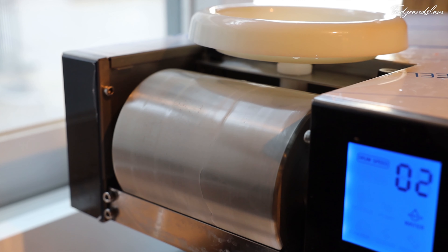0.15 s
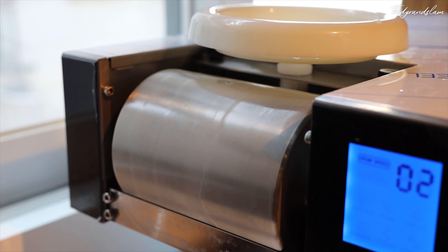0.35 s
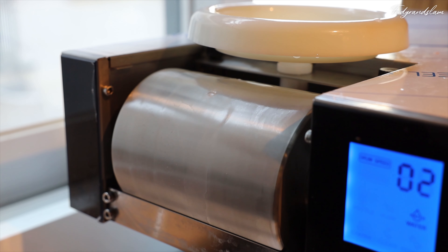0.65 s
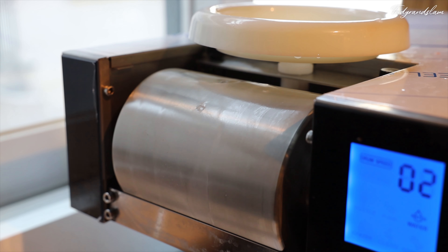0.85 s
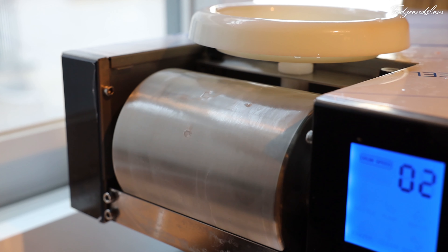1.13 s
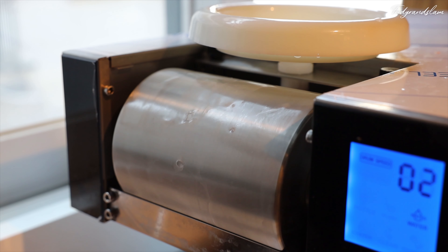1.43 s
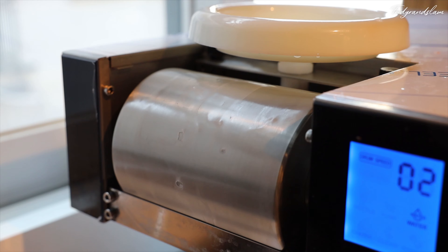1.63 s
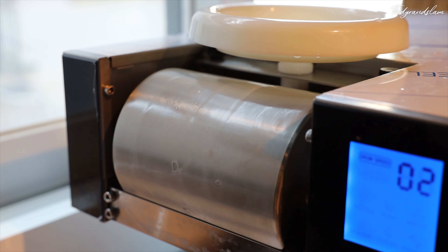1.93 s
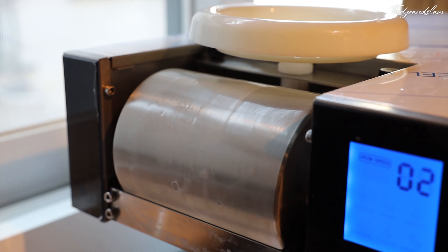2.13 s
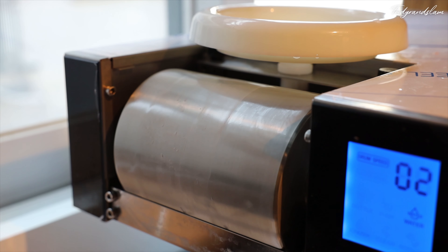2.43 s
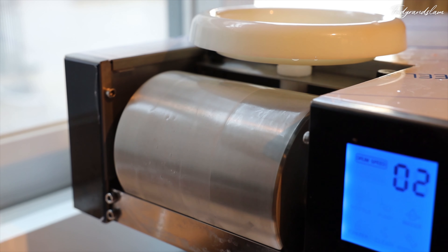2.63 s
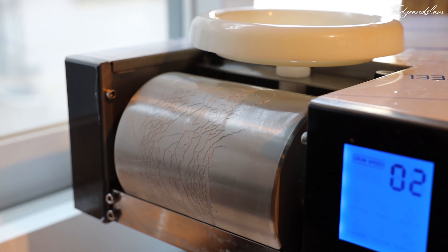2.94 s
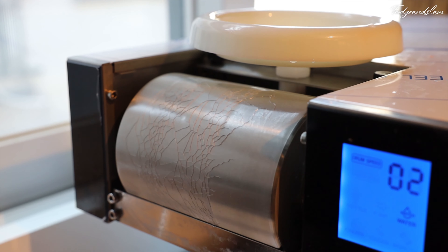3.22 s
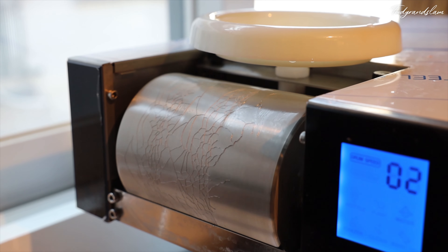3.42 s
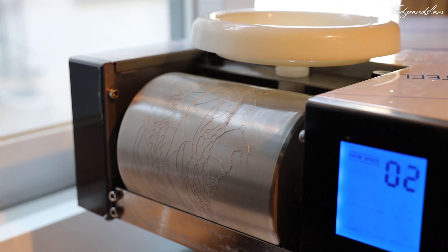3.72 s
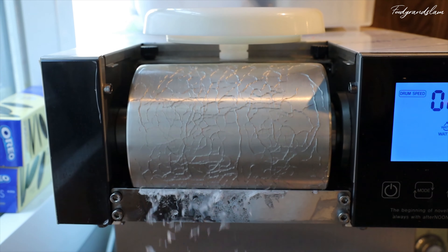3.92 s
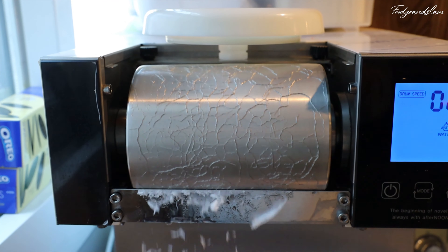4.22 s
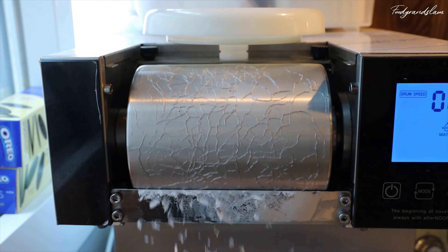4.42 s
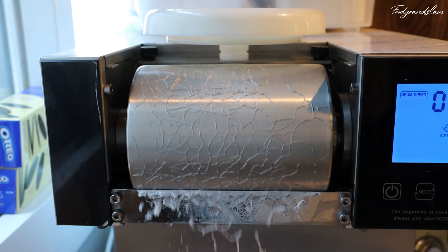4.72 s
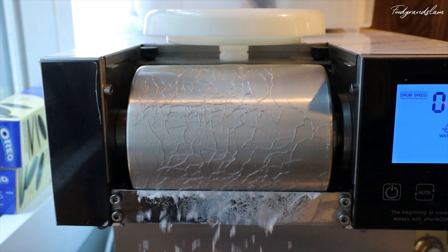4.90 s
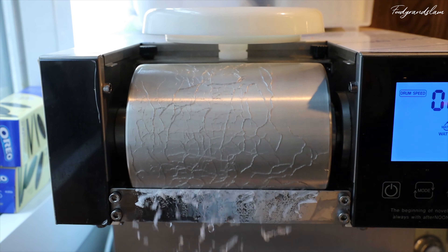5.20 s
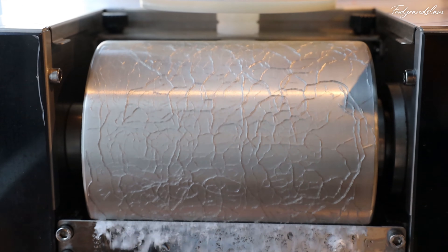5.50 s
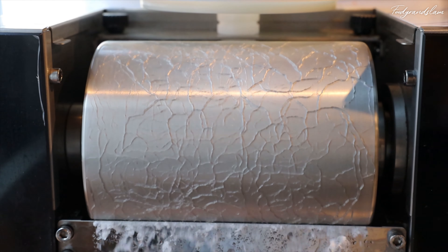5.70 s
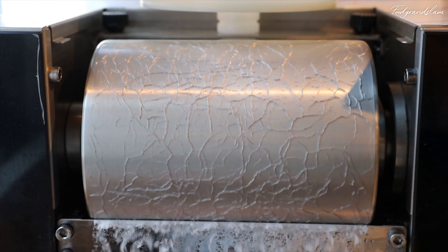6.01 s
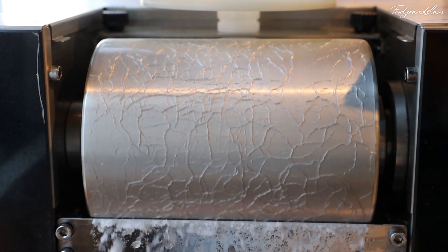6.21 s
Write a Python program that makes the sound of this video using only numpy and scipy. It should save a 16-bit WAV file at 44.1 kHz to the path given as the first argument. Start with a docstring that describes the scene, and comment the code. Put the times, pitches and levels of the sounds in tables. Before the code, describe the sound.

A motorised blade hisses over a turning frozen drum, then bites into a coarse, crackling rasp, with two steel clinks and a dull thump.

```python
"""An ice shaver, close and in mono in a cafe: a blade scrapes a turning frozen drum over the hum of a
geared mains motor. The blade first skims with a thin hiss of tiny fractures, and steel clinks twice.
Then it bites deeper and rasps inside the steel housing while flakes of ice snap off the edge.
A dull knock shakes the counter, and a faint one follows."""
import sys
import numpy as np
from scipy import signal
from scipy.fft import rfft, irfft, next_fast_len
from scipy.io import wavfile
from scipy.ndimage import map_coordinates

SR = 44100
rng = np.random.default_rng(int(sys.argv[2]) if len(sys.argv) > 2 else 0)


def master_out(mix):
    """Clip the mix to full scale and print it as 16-bit PCM to the path in sys.argv[1]."""
    frames = np.transpose(np.atleast_2d(mix))
    ceiling = np.clip(frames, -1, 1)
    pcm = np.round(ceiling * 32767).astype(np.int16)
    wavfile.write(sys.argv[1], SR, pcm)


N = 280035
TIME_S = np.arange(N) / SR
BITE_S, BITE_RISE_S = 3.895, 0.066  # the blade digs in


def amp(db):
    """Decibels to gain."""
    return 10 ** (np.asarray(db) / 20)


def unit(x):
    """x scaled to rms 1."""
    return x / np.sqrt(np.mean(x ** 2) + 1e-20)


def ramp(start_s, rise_s):
    """A straight fade from 0 to 1."""
    return np.clip((TIME_S - start_s) / rise_s, 0, 1)


def decay(start_s, t60, attack):
    """Envelope of a blow; t60 and attack in seconds."""
    age = np.maximum(TIME_S - start_s, 0)
    return amp(-60 * age / t60) * (1 - np.exp(-age / attack))


def wobble(rate):
    """A smooth random curve, rate knots a second."""
    coarse = np.arange(0, N + 32, 32)
    knots = rng.standard_normal(int(N * rate / SR) + 4)
    return np.interp(np.arange(N), coarse, map_coordinates(knots, [coarse * rate / SR]))


def filtered(x, response):
    """x through an EQ given as gain against frequency."""
    size = next_fast_len(N + SR // 2)
    return irfft(rfft(x, size) * response(np.fft.rfftfreq(size, 1 / SR)), size)[:N]


def coloured(x, spectrum):
    """x through an EQ curve of (freq_hz, gain_db) points, at rms 1."""
    freq_hz, gain_db = np.transpose(spectrum)
    return unit(filtered(x, lambda hz: amp(np.interp(np.log(hz + 1), np.log(freq_hz + 1), gain_db))))


def noise(spectrum):
    """Fresh coloured noise at rms 1."""
    return coloured(rng.standard_normal(N), spectrum)


def ring(start_s, modes, attack):
    """Struck modes ring out as damped sines."""
    age = TIME_S - start_s
    return sum(amp(db) * np.sin(2 * np.pi * hz * age) * decay(start_s, t60, attack)
               for hz, db, t60 in modes)


def resonated(x, modes, swell_db):
    """x through resonances that each swell and fade on their own, at rms 1."""
    out = np.zeros(N)
    for hz, width_hz, db in modes:
        b, a = signal.iirpeak(hz, hz / width_hz, SR)
        out += amp(db + swell_db * wobble(11)) * signal.lfilter(b, a, x)
    return unit(out)


def housing(x, wet_db, t60):
    """Dense short echoes between the steel walls ripple the spectrum; the level stays the same."""
    t = np.arange(SR // 6) / SR
    echoes = rng.standard_normal(len(t)) * amp(-60 * t / t60) * (t > 0.001)
    wet = signal.fftconvolve(x, echoes / np.linalg.norm(echoes))[:N]
    return unit(x + amp(wet_db) * wet) * np.std(x)


# Motor harmonics while skimming and while biting: multiple, gain_db
HUM_SKIM = [(1, -17), (2, -13), (3, -7), (4, -24.5), (5, -24), (6, -5.5), (7, -5.5), (8, 1), (9, -16),
            (10, -23), (12, -12.5), (13, -24), (14, -25.5)]
HUM_BITE = [(1, -37), (2, -8), (3, -8), (4, -14), (5, -19.5), (6, -4), (7, 1.5), (8, -5), (9, -24),
            (10, -17), (11, -18), (12, -9)]
# Rush of gears and cooling air: freq_hz, gain_db
RUSH_EQ = [(15, -31), (45, -6), (90, -12), (170, -1), (270, -4.5), (420, -1.5), (680, -1), (850, -6),
           (1020, 0), (1250, -4.5), (1900, -5.5), (3500, -12.5), (9000, -18)]
# Casing resonances: pitch_hz, width_hz, gain_db
PANEL_MODES = [(1432, 11, 5), (1654, 140, -10.5), (2075, 98, -12.5), (2410, 89, -11)]

def motor():
    """A wavering hum that drops and changes colour under load, over rushing air and a ringing casing."""
    motor_hz = 58.27
    bite = ramp(BITE_S, BITE_RISE_S)
    turns = rng.random() + motor_hz * TIME_S + 0.0041 * wobble(9.4)

    def harmonic(k):
        """The frame delays each harmonic more than the last, so the hum is smooth, not pulsing."""
        return amp(0.74 * wobble(21.95)) * np.sin(2 * np.pi * k * (turns - k / 8))

    light = unit(sum(amp(db) * harmonic(k) for k, db in HUM_SKIM))
    loaded = unit(sum(amp(db) * harmonic(k) for k, db in HUM_BITE))
    hum = amp(-34) * (1 - bite) * light + amp(-39) * bite * loaded
    rush = amp(-42 + 0.73 * bite) * housing(noise(RUSH_EQ), wet_db=-3.5, t60=0.24)
    casing = amp(-51.5) * resonated(rng.standard_normal(N), PANEL_MODES, swell_db=1)
    return hum + rush + casing


# Gear whine: mesh_multiple, skim_db, bite_db
GEAR_TONES = [(.557, -62, -55.5), (1, -58.5, -54), (1.52, -56, -99), (2, -59.5, -57.5)]

def gears():
    """The drum drive whines and beats with the motor; under load it sags a little and gets louder."""
    skim_hz, bite_hz = 338.6, 336.0
    bite = ramp(BITE_S, BITE_RISE_S)
    mesh_cycles = np.cumsum(skim_hz + bite * (bite_hz - skim_hz)) / SR + 0.087 * wobble(5)
    out = np.zeros(N)
    for k, skim_db, bite_db in GEAR_TONES:
        level = amp(skim_db + bite * (bite_db - skim_db) + 0.99 * wobble(14))
        out += level * np.sqrt(2) * np.sin(2 * np.pi * (k * mesh_cycles + rng.random()))
    return out


def fractures(rate, spread_db):
    """Ice crystals break in tiny clicks of uneven size, rate a second."""
    hits = rng.random(N) < rate / SR
    return unit(hits * rng.standard_normal(N) * amp(spread_db * rng.standard_normal(N)))


def scraped(spectrum, modes, ring_db, rate, spread_db):
    """Fractures hiss in the housing and ring the blade, ring_db above the hiss; the mix has rms 1."""
    hiss = housing(coloured(fractures(rate, spread_db), spectrum), wet_db=-2.5, t60=0.1)
    blade = resonated(fractures(rate, spread_db), modes, swell_db=2)
    return unit(hiss + amp(ring_db) * blade)


# High spots of ice catch the blade: start_s, hold_s, boost_db
CATCHES = [(0.035, 0.04, 4.5), (0.65, 0.01, 3.0), (0.795, 0.04, 7.5), (1.015, 0.13, 5.0), (2.47, 0.07, 2.5),
           (3.09, 0.02, 2.0)]
# Hollows where the blade nearly loses the ice: centre_s, dip_db
HOLLOWS = [(0.58, 3), (0.995, 2), (2.245, 6), (2.41, 3), (3.2, 5.5)]

def blade_pressure():
    """What the high spots add to the pressure and what the hollows take away, in dB."""
    attack_s, release_s, half_width_s = 0.033, 0.065, 0.025
    catch = sum(db * (ramp(start_s, attack_s) - ramp(start_s + attack_s + hold_s, release_s))
                for start_s, hold_s, db in CATCHES)
    hollow = sum(db * np.exp(-((TIME_S - centre_s) / half_width_s) ** 2) for centre_s, db in HOLLOWS)
    return catch, hollow


# Slow fader moves of the light cut: time_s, scrape_db, sizzle_db
SKIM_FADERS = [(0.0, -41.5, -44), (1.58, -44.5, -50.5), (2.04, -42.5, -43.5), (2.38, -44.5, -44),
               (2.71, -42.5, -40.5), (3.38, -42.5, -41), (3.85, -41, -41.5)]
# Tone of the thin scrape, the low squeal and the airy sizzle: freq_hz, gain_db
SCRAPE_EQ = [(2120, -45), (3600, -12.5), (5190, 2), (5660, -11.5), (6810, -0.5), (8050, -1), (8830, -2),
             (10400, -16), (13100, -13), (15800, -25)]
SQUEAL_EQ = [(1300, -7), (1650, -7), (2000, -17), (2800, 8), (3300, 2), (3800, -18.5)]
SIZZLE_EQ = [(5590, -23), (9500, -4), (11500, -9), (12500, 5), (13100, 3), (13500, -2), (14700, 2),
             (15800, -6)]
# Blade resonances, which shift with how the edge lies on the ice: pitch_hz, width_hz, gain_db
EARLY_MODES = [(4730, 61, -2), (5320, 17, 5), (5960, 28, -0.5), (6720, 110, 0), (7020, 30, -1),
               (7610, 43, 1), (8750, 27, 4), (8530, 29, 0), (8980, 19, -1), (11160, 220, -7),
               (13100, 150, -5.5)]
SETTLED_MODES = [(4110, 63, -0.5), (5350, 49, 3), (6350, 89, -2), (6670, 50, 5), (7310, 41, 4.5),
                 (8130, 59, 0.5), (8750, 81, -3), (10050, 91, -3.5), (10930, 91, -4)]
SQUEAL_MODES = [(1688, 7.2, 3.5), (2200, 24, -10), (2666, 6.3, -1.5), (2820, 18, -2), (3100, 9.5, 0.5)]
SINGING_MODES = [(12100, 80, 6), (12700, 110, -3), (12750, 110, 5), (13230, 80, 0), (13750, 100, -3),
                 (14150, 110, -4)]

def skimming():
    """The light cut follows the pressure: a fluttering scrape, a squeal and a sizzle that turns tonal."""
    times, *faders = np.transpose(SKIM_FADERS)
    scrape_db, sizzle_db = [np.interp(TIME_S, times, fader) for fader in faders]
    catch, hollow = blade_pressure()

    settle = ramp(start_s=1.07, rise_s=1.5)  # the edge settles on the ice
    early = scraped(SCRAPE_EQ, EARLY_MODES, ring_db=1.5, rate=16000, spread_db=-0.5)
    settled = scraped(SCRAPE_EQ, SETTLED_MODES, ring_db=2, rate=16000, spread_db=3.5)
    scrape = np.sqrt(1 - settle) * early + np.sqrt(settle) * settled
    scrape *= amp(scrape_db + 0.75 + catch - hollow)

    wear_db = 1.47 * TIME_S  # the squeal fades as the ice wears smooth
    squeal = scraped(SQUEAL_EQ, SQUEAL_MODES, ring_db=4, rate=9000, spread_db=1.5)
    squeal *= amp(-46 - wear_db + 0.93 * catch - hollow)

    sing = ramp(start_s=1.63, rise_s=0.764)
    plain = housing(noise(SIZZLE_EQ), wet_db=9, t60=0.072)
    singing = scraped(SIZZLE_EQ, SINGING_MODES, ring_db=3, rate=17000, spread_db=1)
    sizzle = amp(2.5) * np.sqrt(1 - sing) * plain + amp(-0.5) * np.sqrt(sing) * singing
    sizzle *= amp(sizzle_db + 0.34 * catch - 1.7 * hollow + 2.2 * wobble(45))

    flutter = amp(1.34 * wobble(50) + 0.42 * wobble(15))
    return (1 - ramp(BITE_S, BITE_RISE_S)) * flutter * (scrape + squeal + sizzle)


# Hits on steel: start_s, crack_db, then one mode_db for each steel mode
CLINKS = [(2.8034, -17.5, -33, -31, -14.5, -19), (3.7408, -15, -28, -29, -34, -22)]
# Ring of the steel: pitch_hz, t60_s
STEEL_MODES = [(2121, 0.17), (2900, 0.18), (3090, 0.068), (3228, 0.21)]
# Bright crack of the hit: freq_hz, gain_db
CRACK_EQ = [(1060, -43), (1800, -15), (2100, -6), (2540, -11), (3110, -4), (3370, -27), (3720, -10.5),
            (5260, -9.5), (5710, -14.5), (8140, -3), (9500, -10), (11400, -12), (12700, -1.5), (15800, -15)]

def clinks():
    """Struck steel: a bright crack with a short tail, and four modes ringing out."""
    out = np.zeros(N)
    for start_s, crack_db, *mode_db in CLINKS:
        burst = decay(start_s, t60=0.041, attack=0.00028)
        tail = amp(-12.5) * decay(start_s, t60=0.15, attack=0.0038)
        modes = [(hz, db, t60) for (hz, t60), db in zip(STEEL_MODES, mode_db)]
        out += amp(crack_db) * (burst + tail) * noise(CRACK_EQ)
        out += ring(start_s, modes, attack=0.0024)
    return out


# Tone of the coarse rasp and the bright spray: freq_hz, gain_db
RASP_EQ = [(290, -40), (500, -46), (650, -2), (708, -16), (777, -2.5), (1440, -11.5), (1910, -2.5),
           (2800, -5.5), (3180, -3.5), (3800, -25), (4940, -39), (8360, -120)]
SPRAY_EQ = [(2060, -11.5), (3500, -5), (4230, -5), (4920, -2.5), (5340, -8), (6490, -1), (7230, -1),
            (8300, -1.5), (9780, -7.5), (14100, -6), (15800, -18)]
# Low and high blade resonances in the deep cut: pitch_hz, width_hz, gain_db
RASP_MODES = [(662, 47, -4), (1000, 29, -7.5), (1666, 80, -0.5), (1920, 74, 2), (2170, 18, 5.5),
              (2485, 28, -1), (3090, 30, 5.5)]
SPRAY_MODES = [(4440, 29, 2.5), (4980, 390, -3), (5350, 75, -2), (5800, 150, -1.5), (7040, 110, 1.5),
               (7360, 170, 1), (8200, 150, 0), (12700, 110, -7)]

def biting():
    """The deep cut slowly swells: a rasp in the blade's low modes and a crackling spray of flakes."""
    swell_db = 1.1 * (TIME_S - BITE_S)
    rasp = amp(-37 + 0.53 * wobble(40))
    rasp *= scraped(RASP_EQ, RASP_MODES, ring_db=2, rate=6000, spread_db=2)
    spray = amp(-37.5 + 0.81 * wobble(220))
    spray *= scraped(SPRAY_EQ, SPRAY_MODES, ring_db=-2, rate=14000, spread_db=2)
    return ramp(BITE_S, BITE_RISE_S) * amp(swell_db + 0.75 * wobble(25)) * (rasp + spray)


def small_flakes(count):
    """Quieter snaps scattered over the deep cut, as rows like LARGE_FLAKES."""
    level_db, scatter_db, body_offset_db, top_offset_db = -24, 2, -6, -7
    starts = BITE_S + (N / SR - BITE_S) * (np.arange(count) + rng.random(count)) / count
    return [(start_s, level_db + scatter_db * rng.standard_normal(), body_offset_db, top_offset_db)
            for start_s in starts]


# Big flakes snapping off the edge: start_s, level_db, body_offset_db, top_offset_db
LARGE_FLAKES = [(3.929, -19.5, -5, 1), (4.2338, -16.5, 0.5, -12), (4.613, -15.5, -15, -9),
                (4.8718, -15.5, -16, -0.5), (5.4405, -8.5, -2.5, -15), (5.7828, -14, -8, -21),
                (5.9643, -14, -7, -14)]

def snaps():
    """Flakes break with a bright crackle and jolt the blade: noise bursts in three bands."""
    middle, top, body = np.zeros((3, N))
    for start_s, level_db, body_offset_db, top_offset_db in LARGE_FLAKES + small_flakes(count=16):
        middle += amp(level_db) * decay(start_s, t60=0.064, attack=0.00045)
        top += amp(level_db + top_offset_db) * decay(start_s, t60=0.058, attack=0.0004)
        body += amp(level_db + body_offset_db) * decay(start_s, t60=0.13, attack=0.001)
    return (amp(-12.5) * middle * noise([(2500, -15), (4200, -7), (8000, 0.5), (10500, -6.5)])
            + amp(-10) * top * noise([(6500, -18), (9000, -6), (13000, 0), (16000, -6.5)])
            + amp(-16) * body * noise([(900, -25), (1900, 7), (3200, 0), (5000, -20)]))


# Knocks on the counter: start_s, clatter_db, boom_db, room_db
KNOCKS = [(3.986, -19, -15.5, -26), (5.294, -30.5, -49, -61)]
# Boom of the counter: pitch_hz, gain_db, t60_s
COUNTER_MODES = [(41, -12, 0.67), (72.5, -12, 0.16), (99, 2, 0.098), (104.4, -14, 0.68), (111, -14, 0.25),
                 (180, -8, 0.23), (243.6, -17.5, 0.39)]
# Clatter of loose parts: freq_hz, gain_db
CLATTER_EQ = [(88, -30), (150, -6), (408, -15), (665, -4), (800, -7), (925, -5), (1340, -5.5), (1490, -5.5),
              (1790, -13.5), (2480, -21), (2800, -39), (3110, -26), (3500, -24), (4550, -57), (7700, -120)]

def knocks():
    """A dull blow: the counter booms, loose parts clatter and the room answers."""
    rumble_eq = [(15, -20), (38, -10), (110, 3), (170, -14), (400, -30.5)]
    out = np.zeros(N)
    for start_s, clatter_db, boom_db, room_db in KNOCKS:
        clatter = amp(clatter_db) * decay(start_s, t60=0.12, attack=0.00092)
        room = amp(room_db) * decay(start_s, t60=0.67, attack=0.013)
        rumble = amp(-12) * decay(start_s, t60=0.74, attack=0.0085) * noise(rumble_eq)
        out += (clatter + room) * noise(CLATTER_EQ)
        out += amp(boom_db) * (ring(start_s, COUNTER_MODES, attack=0.0022) + rumble)
    return out


def scene():
    """All layers mixed to mono, the same in both channels."""
    mono = motor() + gears() + skimming() + clinks() + biting() + snaps() + knocks()
    return np.array([mono, mono])


def record(dry):
    """A brick-wall low-pass takes off the very top."""
    cutoff_hz = 15900
    return np.array([filtered(channel, lambda hz: hz < cutoff_hz) for channel in dry])


dry = scene()
out = record(dry)
master_out(out)
```